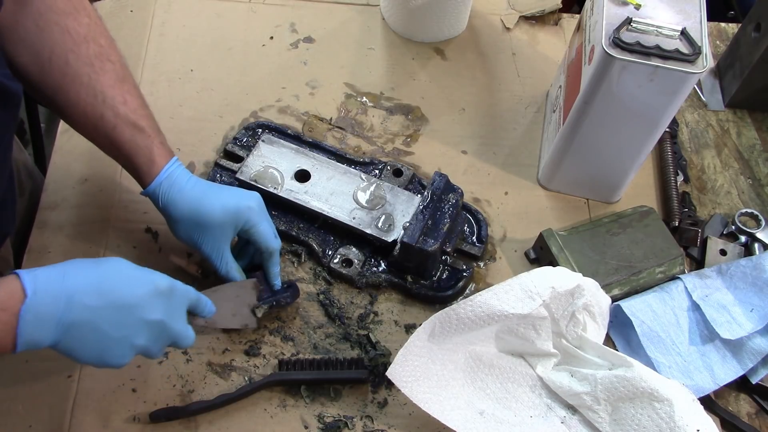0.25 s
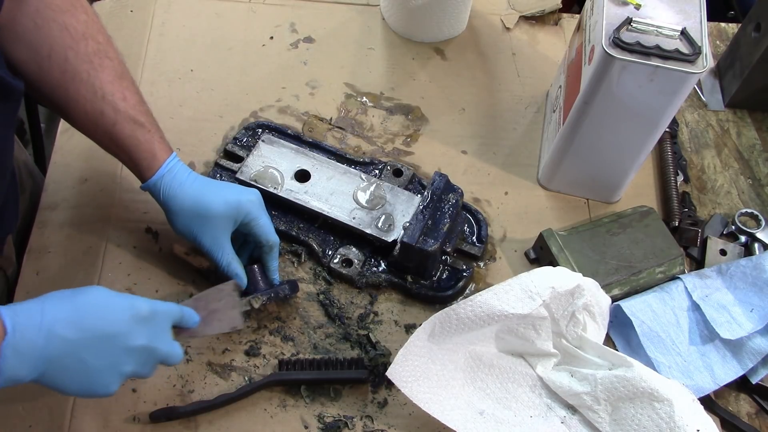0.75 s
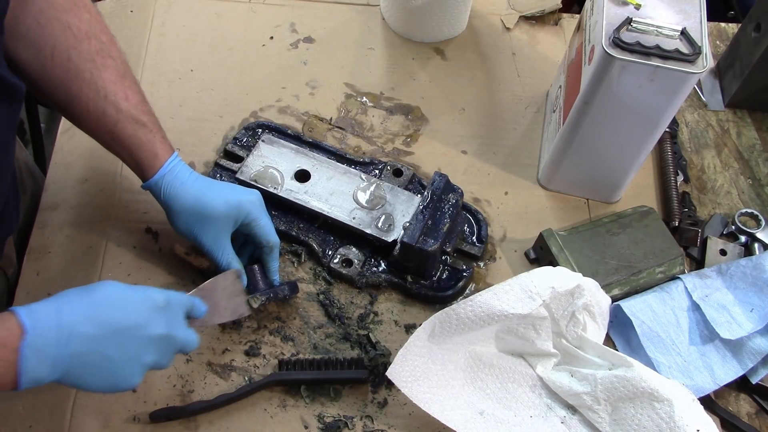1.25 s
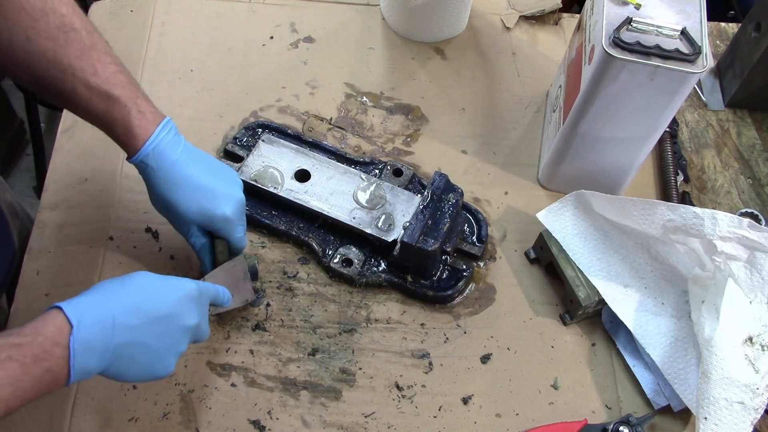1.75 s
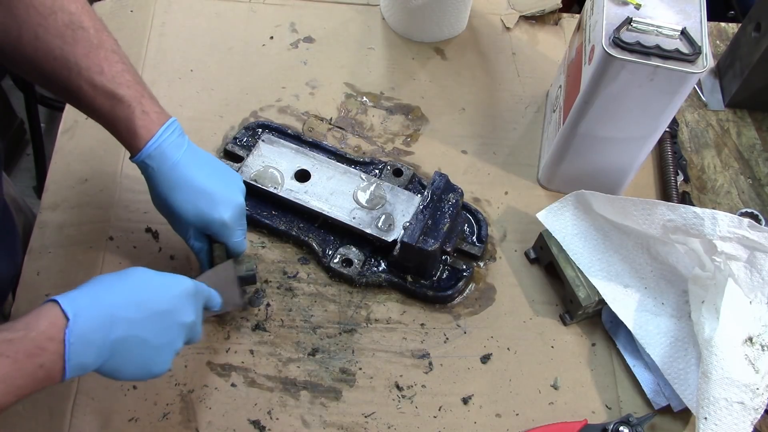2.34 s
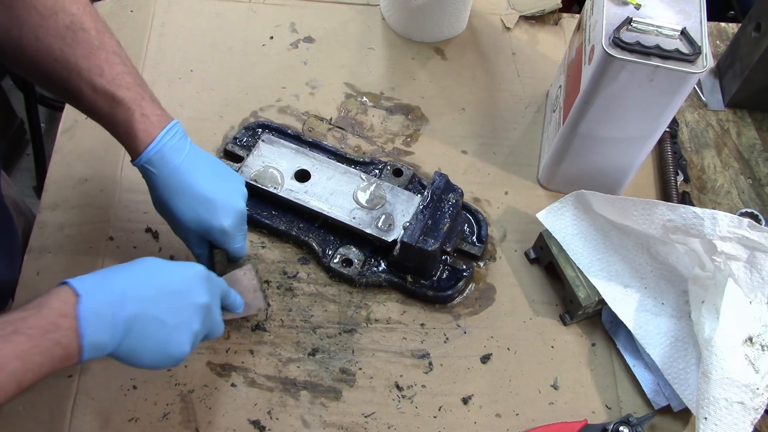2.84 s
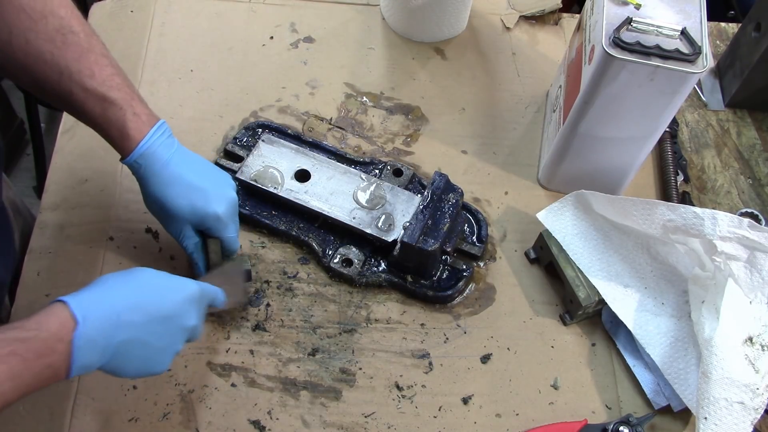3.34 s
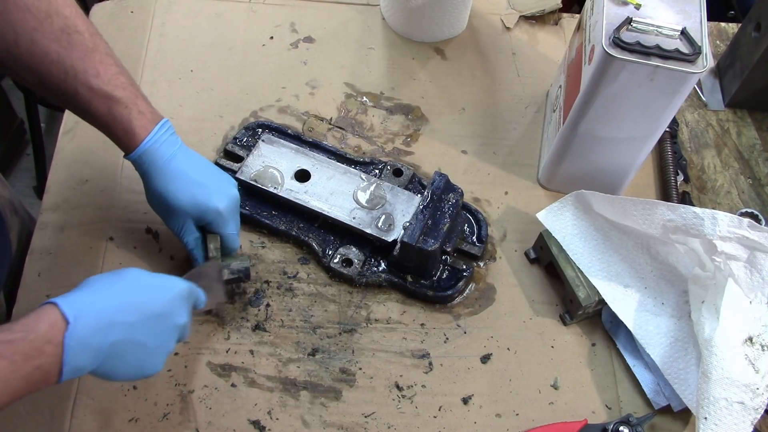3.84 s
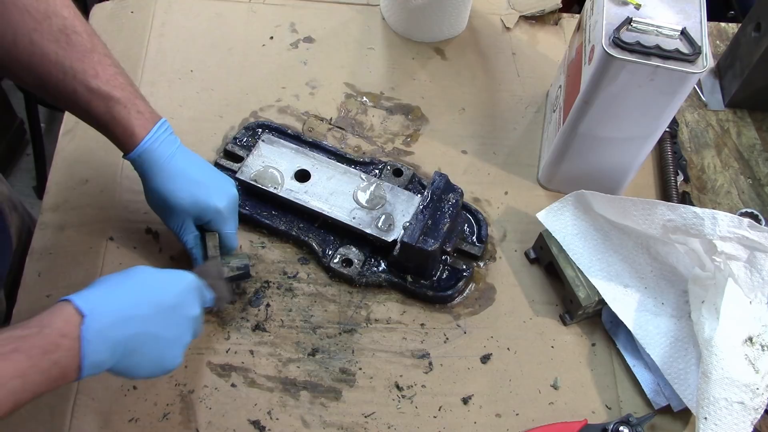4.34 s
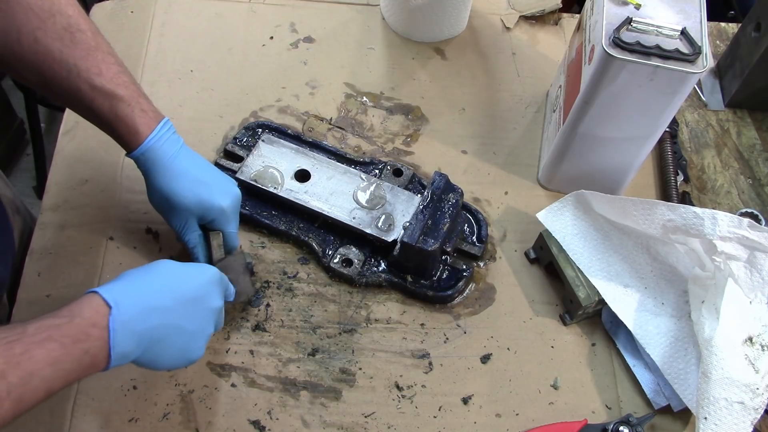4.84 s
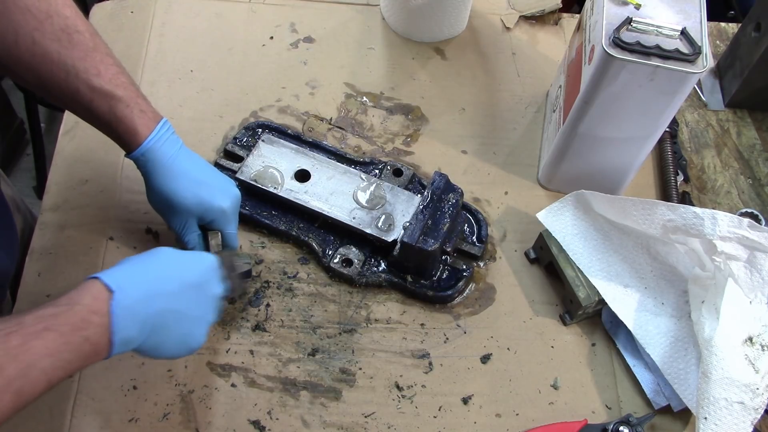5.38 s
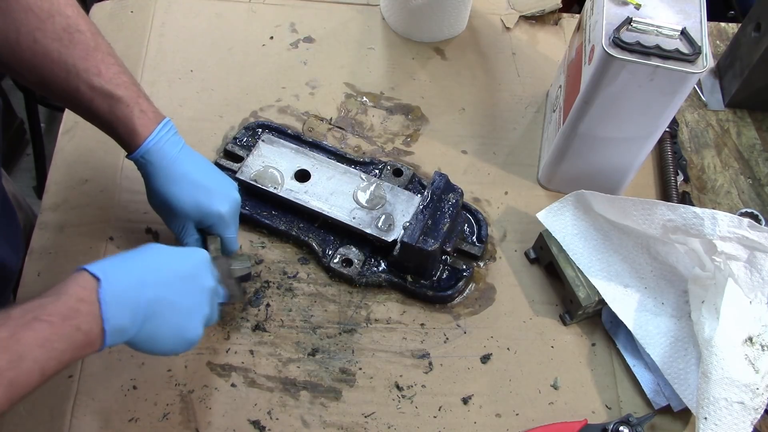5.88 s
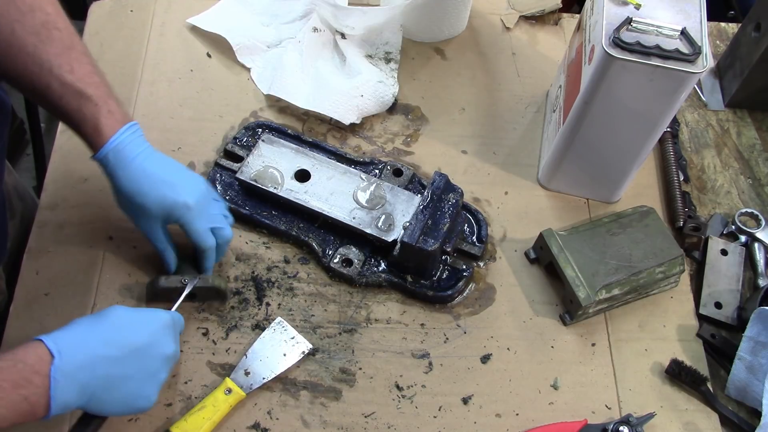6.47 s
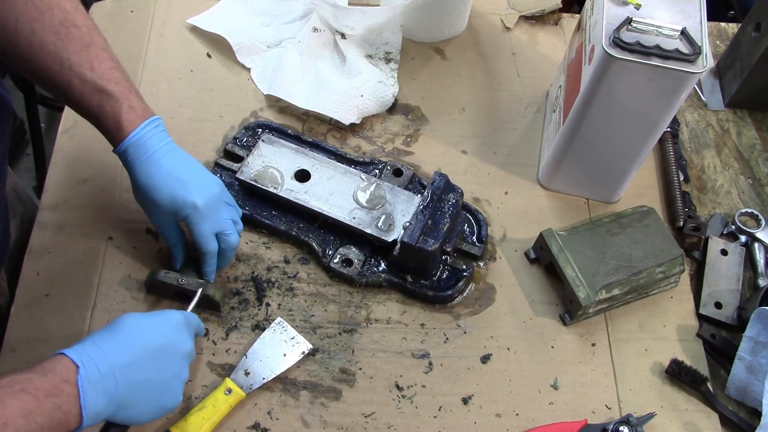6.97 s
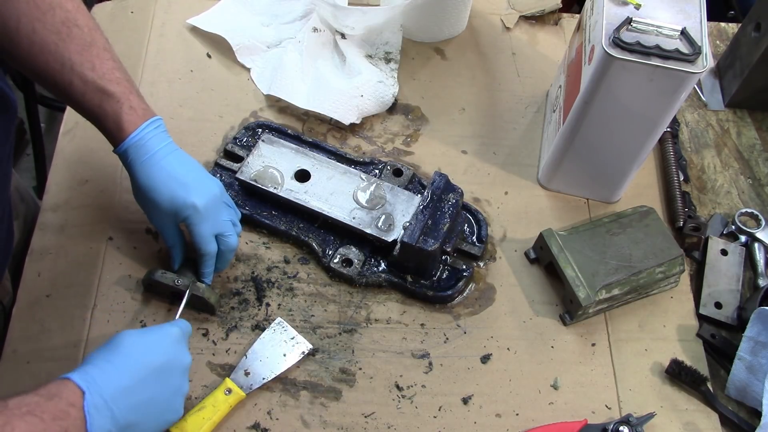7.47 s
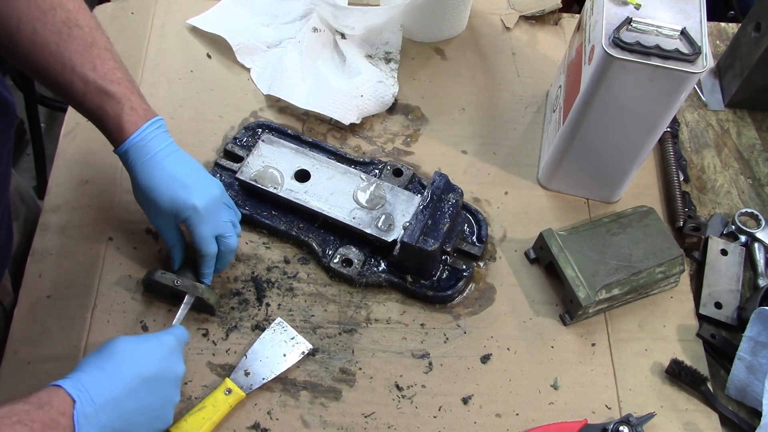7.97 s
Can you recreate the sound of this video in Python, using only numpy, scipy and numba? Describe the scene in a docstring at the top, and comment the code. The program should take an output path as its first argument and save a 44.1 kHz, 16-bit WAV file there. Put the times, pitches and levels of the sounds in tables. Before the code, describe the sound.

A blade rasps paint off a small metal piece in rapid back-and-forth strokes with dull knocks, then a steel point scratches, snags and thumps the bench.

```python
"""Scraping paint at the workbench

Close by, a putty knife scrapes softened paint off a small metal part on a cardboard-covered bench.
Its strokes, up to about twelve a second, are on the corner, flat, then tilted; a pointed tool follows.
Random grains ring tool and part, short skids of noise make the catches, and paired sines thud the bench.
A small workshop answers with echoes and a tail, over air, hum, rumble and one swell of rumble and hiss."""
import sys
import numpy as np
from scipy import signal
from scipy.fft import rfft, irfft, next_fast_len
from scipy.io import wavfile
from numba import njit

SR = 44100
rng = np.random.default_rng(int(sys.argv[2]) if len(sys.argv) > 2 else 0)


def log_audio(samples):
    """Write samples as a 16-bit WAV file to the path given in sys.argv[1]."""
    # one column per channel
    frames = np.atleast_2d(samples).T
    # limit to full scale, then quantise
    limited = np.clip(frames, -1, 1)
    pcm = np.round(limited * 32767).astype(np.int16)
    wavfile.write(sys.argv[1], SR, pcm)


N = 362502
TIME = np.arange(N) / SR
FLAT_FROM_S = 1.395   # from here the knife is heard flat, and rumble and hiss swell


def from_db(db):
    """Decibels to gain."""
    return 10 ** (np.asarray(db) / 20)


def rms_one(x):
    """Scale to unit rms."""
    return x / np.sqrt(np.mean(x ** 2) + 1e-20)


def in_time(rows):
    """Read rows of (seconds, value) as a curve at every sample."""
    return np.interp(TIME, *np.transpose(rows))


def at_hz(points, hz):
    """Read rows of (Hz, value) on a log-frequency axis."""
    table_hz, values = np.transpose(points)
    return np.interp(np.log(hz + 1e-9), np.log(table_hz), values)


def cut(x, hz, kind, order=4):
    """Butterworth filter."""
    sections = signal.butter(order, hz, kind, fs=SR, output="sos")
    return signal.sosfilt(sections, x + 1e-18)


def coloured(x, spectrum):
    """Give a steady signal a spectrum; rms 1."""
    size = next_fast_len(N)
    hz = np.arange(size // 2 + 1) * SR / size
    shaped = rfft(x, size) * from_db(at_hz(spectrum, hz))
    return rms_one(irfft(shaped, size)[:N])


def noise():
    """White noise."""
    return rng.standard_normal(N)


def drift(hz):
    """Slow chance: low-passed noise with spread 1."""
    return rms_one(cut(noise(), hz, "low", order=2))


def resonate(x, modes):
    """Parallel two-pole resonances of alternating sign."""
    out = 0
    for k, (hz, width, db) in enumerate(modes):
        r = np.exp(-np.pi * width / SR)
        poles = [1, -2 * r * np.cos(2 * np.pi * hz / SR), r * r]
        gain = (-1) ** k * from_db(db) * (1 - r * r) / 2
        out = out + gain * signal.lfilter([1, 0, -1], poles, x + 1e-18)
    return out


@njit
def gliding_mode(x, turn_angle, r):
    """A two-pole resonance whose angle per sample moves."""
    out, last, before = np.zeros(len(x)), 0.0, 0.0
    for i in range(2, len(x)):
        driven = (1 - r * r) / 2 * (x[i] - x[i - 2])
        out[i] = driven + 2 * r * np.cos(turn_angle[i]) * last - r * r * before
        last, before = out[i], last
    return out


def background(air_db=-56):
    """Room air, hum, an uneven rumble, and a swell of low rumble and hiss that holds briefly and fades."""
    # Still air of the workshop. Each row: frequency in Hz, relative level in dB per Hz.
    air_colour = [(50, -21), (110, -6.5), (250, 0.5), (450, -8), (900, -6), (2000, -14.5), (6000, -26),
                  (16000, -41)]
    # Hum. Each row: frequency in Hz, rms level in dB.
    hum_tones = [(59.3, -62)]
    # Low rumble before the swell is added. Each row: time in seconds, level in dB.
    rumble_level = [(0, -42.5), (.6, -57.5), (2.2, -51), (3.6, -57.5), (4.15, -48), (4.6, -54), (5.6, -47),
                    (6.6, -56), (7, -48.5), (8.22, -47)]
    # Colours of rumble and hiss. Each row: frequency in Hz, relative level in dB per Hz.
    rumble_colour = [(12, -28), (25, -11.5), (60, -1.5), (100, -5), (160, -15.5), (250, -24), (500, -24.5),
                     (1500, -46)]
    hiss_colour = [(100, -13), (300, -19), (750, -1), (1300, -1), (4000, -10), (11000, -29), (16000, -32)]
    hum = sum(from_db(db) * np.sqrt(2) * np.sin(2 * np.pi * hz * TIME) for hz, db in hum_tones)

    attack_s, steady_until_s, fade_db_per_s = .025, 0.16, 31.5
    swell_rumble_db, swell_hiss_db = -32, -47.5
    age = TIME - FLAT_FROM_S
    fade = from_db(-fade_db_per_s * np.maximum(age - steady_until_s, 0))
    swell = np.clip(age / attack_s, 0, 1) * fade
    rumble_gain = np.hypot(from_db(in_time(rumble_level)), from_db(swell_rumble_db) * swell)
    rumble = rumble_gain * coloured(noise(), rumble_colour)
    hiss = from_db(swell_hiss_db) * swell * coloured(noise(), hiss_colour)
    return from_db(air_db) * coloured(noise(), air_colour) + hum + rumble + hiss


def scrape(strokes, modes, rub, rub_db, grains_per_s, grain_db, judder_db, judder_hz, sharpness, glide, direction,
           seat_db=6.5, seat_detune=0.045, stiff_hz=6000, bite=1.2):
    """Paint breaks away in tiny grains that ring tool and part; each stroke presses, slides and lets go."""
    # Edges between board, body, bright edge and treble grit, in Hz.
    low, middle, high = [900, 3000, 6000]
    ranges = [(low, "low"), ([low, middle], "band"), ([middle, high], "band"), (high, "high")]
    bands = [signal.butter(4, hz, kind, fs=SR, output="sos") for hz, kind in ranges]

    sizes = from_db(grain_db * np.minimum(rng.exponential(1, N), 4)) * rng.choice([-1, 1], N)
    grains = sizes * (rng.random(N) < grains_per_s / SR)
    judder = from_db(judder_db * np.tanh(drift(judder_hz)))   # the edge sticks and slips
    grains = rms_one(grains * judder)
    rubbing = from_db(rub_db) * coloured(grains, rub)

    seats = rng.standard_normal((len(strokes), len(modes), 2))   # the edge never sits twice in the same way
    out = np.zeros(N)
    for k, (start, hardest, end, db, board_db, edge_db, grit_db) in enumerate(strokes):
        span = slice(max(int(start * SR), 0), int(end * SR))
        t = TIME[span]
        slide = direction ** k * np.linspace(-1, 1, len(t))   # the moving contact bends the modes
        ringing = 0
        for (hz, width, mode_db), (louder, higher) in zip(modes, seats[k]):
            # the board's modes stay put, the top ones move less
            freedom = (hz > low) / (1 + (hz / stiff_hz) ** 2)
            pitch = hz * (1 + freedom * (glide * slide + seat_detune * higher))
            mode = gliding_mode(grains[span], 2 * np.pi * pitch / SR, np.exp(-np.pi * width / SR))
            ringing = ringing + from_db(mode_db + seat_db * louder) * mode
        sound = rms_one(ringing) + rubbing[span]

        # the part rings with what the edge leaves
        body_db = 10 * np.log10(max(1 - from_db(edge_db) ** 2, .1))
        levels = from_db(db + np.array([board_db, body_db, edge_db, grit_db]))
        phase = np.interp(t, [start, hardest, t[-1]], [0, .5, 1])
        force = np.abs(np.sin(np.pi * phase)) ** sharpness
        force = np.tanh(bite * force) / np.tanh(bite)   # friction levels off once the edge has bitten
        split = [rms_one(signal.sosfilt(band, sound)) for band in bands]
        out[span] += force * sum(level * part for level, part in zip(levels, split))
    return out


def knife_strokes():
    """Draws are thin and gritty, pushes load the board; curves over time shade the colour of both."""
    # Knife strokes, drawn and pushed in turn.
    # Each row: start in seconds, length in seconds, level in dB before force and unevenness.
    stroke_table = [(0.0, 0.077, -42), (0.103, 0.073, -38.5), (0.446, 0.09, -39.5), (0.577, 0.066, -41),
                    (0.674, 0.075, -37.5), (0.794, 0.094, -33.5), (0.921, 0.077, -32.5),
                    (1.043, 0.076, -33.5), (1.152, 0.076, -31.5), (1.264, 0.075, -31.5), (1.448, 0.11, -44),
                    (1.682, 0.079, -37), (1.84, 0.058, -42.1), (1.907, 0.08, -37.5), (2.056, 0.07, -39),
                    (2.151, 0.07, -29.1), (2.294, 0.065, -33), (2.378, 0.065, -27), (2.499, 0.066, -32),
                    (2.593, 0.082, -32.5), (2.722, 0.04, -30.5), (2.81, 0.074, -31.5), (2.914, 0.085, -35),
                    (3.028, 0.066, -28), (3.18, 0.04, -27.5), (3.249, 0.079, -33), (3.371, 0.073, -39.5),
                    (3.468, 0.057, -36), (3.53, 0.04, -43), (3.592, 0.061, -34), (3.68, 0.036, -37),
                    (3.73, 0.048, -38), (3.814, 0.065, -36.5), (3.897, 0.093, -35.5), (4.03, 0.067, -31),
                    (4.141, 0.072, -34.5), (4.246, 0.089, -34), (4.363, 0.047, -30), (4.484, 0.06, -35),
                    (4.562, 0.076, -31), (4.698, 0.06, -34.5), (4.784, 0.076, -31), (4.916, 0.057, -35),
                    (5.007, 0.093, -30.0), (5.16, 0.039, -27), (5.24, 0.067, -31), (5.396, 0.028, -26),
                    (5.474, 0.037, -27.5), (5.588, 0.044, -28.5), (5.669, 0.069, -28.5),
                    (5.826, 0.035, -22.5), (5.916, 0.052, -26)]
    # Low board, bright edge and treble grit. Each row: time in seconds, offset in dB.
    board_level = [(.6, -0.5), (1.1, -8), (2.3, -14.5), (2.8, -4.5), (3.3, -15), (4.15, -3), (4.5, -17),
                   (5.1, -13), (5.6, -5.5), (5.9, -10.5)]
    edge_level = [(1.33, -8.5), (1.5, -5), (3.3, -3), (4.2, -3.5), (4.4, 0), (5.42, .5), (5.5, -3),
                  (5.95, -5)]
    grit_level = [(.7, 1), (1.7, -2), (2.5, 0.5), (4, 0), (4.6, 2), (5.4, 1.5), (5.6, -4.5)]
    # share of the stroke before it is hardest, then board, edge and grit in dB
    draw, push = (0.96, -3, 0, -13), (0.73, 4, -1, -14.5)
    rows = []
    for k, (start, length, db) in enumerate(stroke_table):
        rise, *colour_db = push if k % 2 else draw
        hardest = start + rise * length
        curves = (board_level, edge_level, grit_level)
        offset_db = [np.interp(hardest, *np.transpose(curve)) for curve in curves]
        rows.append((start, hardest, start + length, db, *np.add(colour_db, offset_db)))
    return rows


def knife():
    """The putty knife on its corner bends pitch one way; flat, then tilted, it bends to and fro."""
    # Resonances of tool and part for each way the blade lies, before each stroke shifts them.
    # Each row: frequency in Hz, width in Hz, relative level in dB.
    corner_modes = [(487, 51, 2.5), (700, 150, -4.5), (1066, 69, -10), (1545, 54, -1.5), (2240, 136, 7),
                    (2620, 76, 3.5), (3440, 89, -19), (3860, 160, 4.5), (4690, 46, -14), (5760, 100, -13.5),
                    (7600, 220, -15), (8800, 110, -18)]
    flat_modes = [(461, 18, 7.5), (614, 35, 3.5), (1290, 71, 4), (1830, 122, 6.5), (2052, 56, 4.5),
                  (2880, 80, -13.5), (3710, 330, -3), (4065, 61, 5.5), (5040, 115, 0.5), (6670, 270, -11),
                  (7750, 110, -12.5), (9170, 200, -16), (9750, 51, -37), (12400, 130, -22)]
    tilted_modes = [(447, 31, 0), (602.5, 43, 7), (1360, 310, -10), (1940, 148, 11.5), (2890, 83, -28),
                    (3504, 80, -6.5), (4030, 57, -0.5), (4600, 39, -5), (5156, 53, 3.5), (6830, 500, -8),
                    (8060, 110, -37), (8670, 80, -9), (10300, 300, -16), (12600, 890, -20)]
    # Broad colour of the rubbing. Each row: frequency in Hz, relative level in dB per Hz.
    rub = [(100, 7.5), (320, -3), (580, 8), (850, -7), (1500, 7.5), (3500, 2), (6000, -41.5), (10000, -8),
           (13000, -24), (16000, -25)]
    tilted_from_s = 4.36
    rows = knife_strokes()

    def between(first, last):
        """The strokes that are hardest between two times."""
        return [row for row in rows if first < row[1] < last]

    corner = scrape(between(0, FLAT_FROM_S), corner_modes, rub, rub_db=-8, grains_per_s=9000, grain_db=3.0,
                    judder_db=1.0, judder_hz=149, sharpness=1.01, glide=0.029, direction=1)
    flat = scrape(between(FLAT_FROM_S, tilted_from_s), flat_modes, rub, rub_db=-7.5, grains_per_s=6000,
                  grain_db=-0.5, judder_db=5.0, judder_hz=132, sharpness=1.28, glide=0.051, direction=-0.995)
    tilted = scrape(between(tilted_from_s, TIME[-1]), tilted_modes, rub, rub_db=-9.0, grains_per_s=9000,
                    grain_db=3.0, judder_db=6.5, judder_hz=133, sharpness=1.09, glide=0.03, direction=-0.98)
    return corner + flat + tilted


def catches(rows, skid_s=0.0036, ring_q=16, crack_hz=4500):
    """Each catch is a skid of a few milliseconds into the part's modes, with a ring and a treble crack."""
    # Modes of the struck part. Each row: frequency in Hz, width in Hz, relative level in dB.
    part_modes = [(437, 360, 3), (1090, 260, 5), (1930, 184, 13.5), (2880, 400, 11), (3920, 380, 6.5),
                  (5120, 99, 1), (6330, 140, -6), (9600, 300, -10)]
    out, t = np.zeros(N + SR), TIME[:SR // 8]
    for s, db, hz, ring_db, crack_db in rows:
        skid = rng.standard_normal(len(t)) * np.exp(-(t / skid_s) ** 4)
        body = resonate(skid, part_modes)
        ring = resonate(skid, [(hz, hz / ring_q, 0)])
        crack = cut(skid, crack_hz, "high", order=1)
        at = int(s * SR)
        for layer, layer_db in ((body, 0), (ring, ring_db), (crack, crack_db)):
            out[at:at + len(t)] += from_db(db + layer_db) * layer / np.abs(layer).max()
    return out[:N]


def knife_catches(crack_db=-25):
    """The knife slips off an edge and knocks dully, with a ring set by where it lands."""
    # Each row: time in seconds, peak of the part's modes in dB, ring in Hz, ring against that peak in dB.
    catch_table = [(.1455, -10.5, 1830, -5.5), (0.179, -26.5, 2260, 16), (.344, -8, 3000, -14),
                   (1.645, -33, 3980, 3.5), (2.303, -30, 3870, 3.5), (2.551, -22, 3580, 4),
                   (2.729, -26, 1830, 1), (2.751, -26, 1526, 8.5), (3.193, -23.5, 1900, -3),
                   (3.643, -22, 2010, -1.5), (3.977, -24, 574, 2.5), (5.167, -27, 2320, 8),
                   (5.502, -23, 556, 2.5), (5.829, -27, 1970, 7.5), (5.852, -23, 1870, 0),
                   (5.976, -35, 1380, 7)]
    return catches([(s, db, hz, ring_db, crack_db) for s, db, hz, ring_db in catch_table])


def squeak(width_hz=75, upper_ratio=1.9, upper_db=-2):
    """Two narrow modes, driven by noise, glide as the corner digs in on its last push."""
    # Each row: time in seconds, lower mode in Hz, its level in dB.
    s, hz, db = np.transpose([(1.271, 1370, -49), (1.3, 1420, -33.5), (1.335, 1390, -44.5),
                              (1.385, 1500, -49), (1.395, 1480, -100)])
    turn_angle = 2 * np.pi * np.interp(TIME, s, hz) / SR
    r = np.exp(-np.pi * width_hz / SR)
    lower = rms_one(gliding_mode(noise(), turn_angle, r))
    upper = rms_one(gliding_mode(noise(), upper_ratio * turn_angle, r))
    level_db = np.interp(TIME, s, db, left=-np.inf, right=-np.inf)
    return (lower + from_db(upper_db) * upper) * from_db(level_db)


def pick_catches(ring_hz=2200, ring_db=-7.5):
    """The point snags or taps, and cracks more sharply the harder it catches."""
    # Each row: time in seconds, peak of the part's modes in dB.
    catch_table = [(6.154, -33), (6.283, -24.5), (6.458, -48), (6.811, -33.5), (6.857, -37), (6.896, -19),
                   (7.086, -18), (7.382, -32.5), (7.476, -30), (7.826, -19.5), (8.193, -20)]
    # crack of a firm catch against its peak, and extra dB per dB above firm
    firm_db, firm_crack_db, crack_growth = -19.5, 3.5, 1.5
    rows = []
    for s, db in catch_table:
        crack_db = firm_crack_db + crack_growth * (db - firm_db)
        rows.append((s, db, ring_hz, ring_db, crack_db))
    return catches(rows)


def pick_strokes(rise=0.52):
    """The harder the point is pressed, the brighter it scratches."""
    # Each row: start in seconds, length in seconds, level in dB before force and unevenness.
    stroke_table = [(6.161, 0.05, -41.5), (6.199, 0.05, -25), (6.882, 0.052, -26.5), (6.965, 0.047, -29.5),
                    (7.046, 0.054, -27.5), (7.139, 0.062, -30), (7.41, 0.048, -42.5), (7.623, 0.036, -31.5),
                    (7.693, 0.053, -29), (7.794, 0.052, -29.5), (7.872, 0.076, -29.5), (7.997, 0.036, -29),
                    (8.07, 0.059, -36.5), (8.137, 0.082, -32)]
    # Low board, bright edge, treble grit: offsets in a firm stroke in dB, then change in dB per dB of force.
    firm_colour_db = np.array((-13.5, -5, -8.5))
    colour_slope = np.array((-0.94, 0.19, .4))
    firm_db = -27.5
    rows = []
    for start, length, db in stroke_table:
        colour_db = firm_colour_db + colour_slope * (db - firm_db)
        rows.append((start, start + rise * length, start + length, db, *colour_db))
    return rows


def pick():
    """The steel point scratches with sparse grains through its own set of modes."""
    # Tool and part before each stroke shifts them. Each row: frequency in Hz, width in Hz, relative level in dB.
    point_modes = [(453, 44, -11.5), (636, 72, -9), (1230, 130, -6), (2033, 47, 3), (2247, 176, 10.5),
                   (3920, 330, -1.5), (5980, 80, -12), (6430, 150, -4), (7400, 280, -6), (8270, 200, -21),
                   (8960, 71, -36), (10660, 92, -7), (11900, 220, -18), (11300, 160, -14)]
    # Broad colour of the rubbing. Each row: frequency in Hz, relative level in dB per Hz.
    rub = [(100, 7), (250, 7), (850, -5), (1400, 6.5), (2500, -15), (5000, -6), (10000, 9), (13000, -26),
           (16000, -26)]
    return scrape(pick_strokes(), point_modes, rub, rub_db=-7.5, grains_per_s=5100, grain_db=3.0,
                  judder_db=4.0, judder_hz=187, sharpness=1.9, glide=0.018, direction=-0.52)


def thuds(hz=84, t60=0.14, upper_hz=150, upper_db=-9):
    """The hand drives the part into the bench, whose top swings a few cycles in two modes."""
    # Each row: time in seconds, starting level of the lower mode in dB.
    thud_table = [(6.215, -28), (6.927, -29), (7.005, -31.5), (7.09, -21.5), (7.654, -24), (7.835, -20.5),
                  (8.026, -30.5), (8.195, -21.5)]
    out = np.zeros(N)
    for s, db in thud_table:
        t = TIME[:N - int(s * SR)]
        swing = np.sin(2 * np.pi * hz * t) + from_db(upper_db) * np.sin(2 * np.pi * upper_hz * t)
        out[N - len(t):] += from_db(db - 60 * np.minimum(t / t60, 10)) * swing
    return out


def turn():
    """A soft, dull rub of shaped noise as the part is turned round on the cardboard."""
    # Start in seconds, length in seconds, level in dB at the middle.
    start, length, db = (6.47, 0.14, -45)
    # Each row: frequency in Hz, relative level in dB per Hz.
    cardboard_colour = [(120, -50), (200, -11), (347, -17), (430, -2), (815, -15), (1250, -1), (3090, -19),
                        (3960, -28), (5270, -24.5), (14000, -34)]
    swell = np.sin(np.pi * np.clip((TIME - start) / length, 0, 1))
    return from_db(db) * swell * coloured(noise(), cardboard_colour)


def workshop(x, early_db=-13, late_db=-15, gap_s=0.0085):
    """A few quick echoes from bench and tins, then a diffuse tail that dies band by band."""
    # Decay of the workshop. Each row: frequency in Hz, time to fall 60 dB in seconds.
    room_t60 = [(250, 0.81), (1000, 0.42), (3000, 0.18), (7000, 0.33), (14000, 0.25)]
    t, tail = TIME[:SR // 2], 0
    edges = np.geomspace(120, 16000, 8)
    for low, high in zip(edges, edges[1:]):
        band = cut(rng.standard_normal(len(t)), [low, high], "band", order=2)
        tail = tail + band * from_db(-60 * t / at_hz(room_t60, np.sqrt(low * high)))
    tail = tail * (t > gap_s)
    response = from_db(late_db) * tail / np.linalg.norm(tail)
    echoes = (rng.uniform(0.001946, .014, size=6) * SR).astype(int)
    signs = rng.choice([-1, 1], len(echoes))
    response[echoes] += from_db(early_db) * signs / np.sqrt(len(echoes))
    return x + signal.fftconvolve(x, response)[:N]


def scene(uneven_db=0.67, uneven_hz=40):
    """Tools and bench sound in the workshop, over its background."""
    # the paint is uneven, so the drag wavers inside a stroke
    waver = from_db(uneven_db * drift(uneven_hz))
    scraping = (knife() + squeak() + pick()) * waver
    knocks = knife_catches() + pick_catches()
    return (workshop(scraping + knocks + turn() + thuds()) + background())[None]


def record(dry, microphone_hz=14000, cutoff_hz=15900):
    """The level dips briefly twice; the microphone dulls the highest treble and the top is cut."""
    # Times of the dips in seconds.
    dips_s = [1.395, 6.034]
    dip = 1 - .95 * sum(np.exp(-((TIME - s) / .006) ** 4) for s in dips_s)
    heard = cut(dry * dip, microphone_hz, "low", order=2)
    top_cut = signal.ellip(12, .1, 80, cutoff_hz, fs=SR, output="sos")
    return signal.sosfilt(top_cut, heard)


dry = scene()
out = record(dry)
log_audio(out)
```